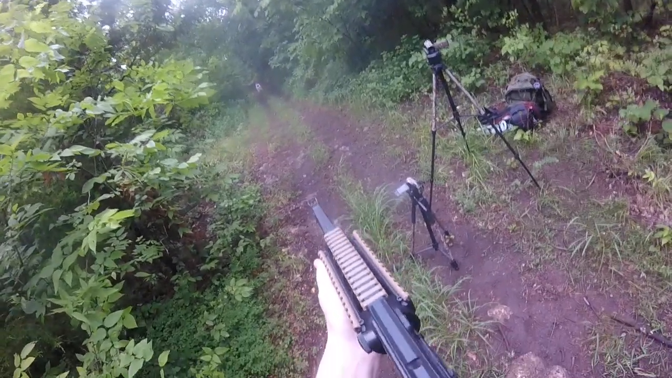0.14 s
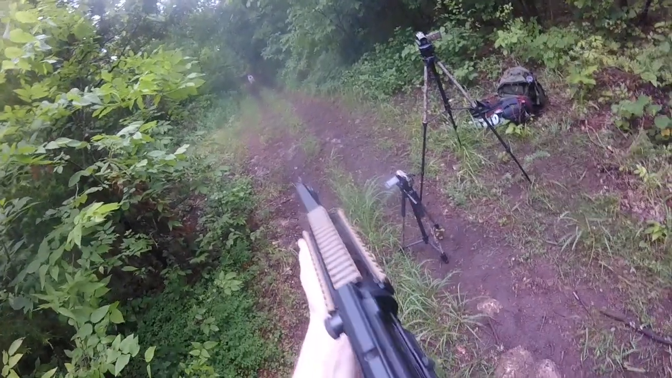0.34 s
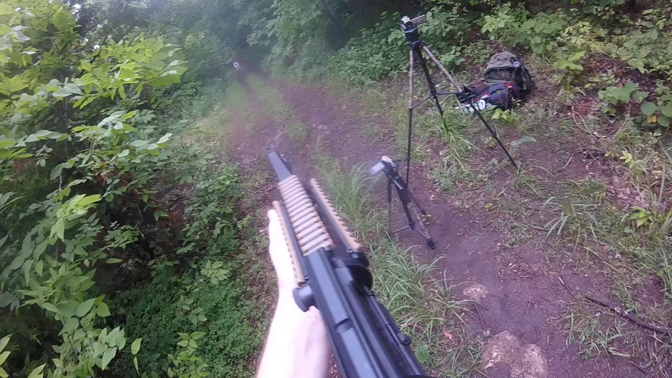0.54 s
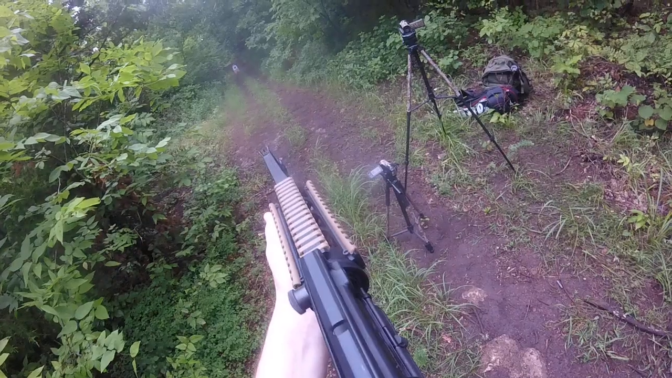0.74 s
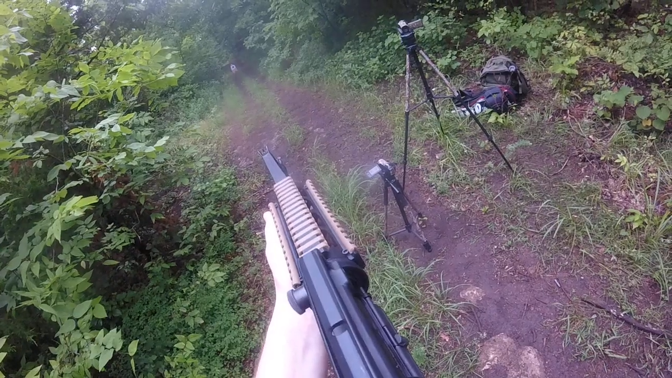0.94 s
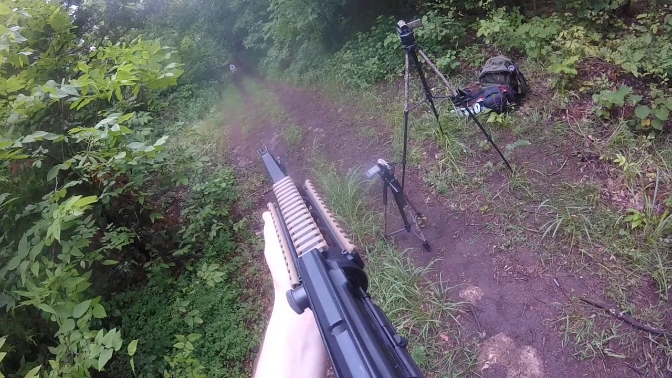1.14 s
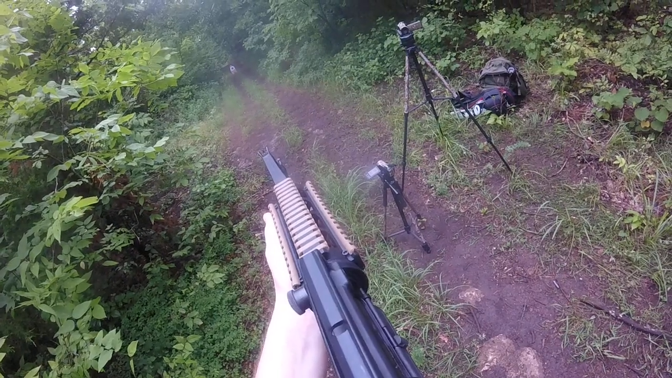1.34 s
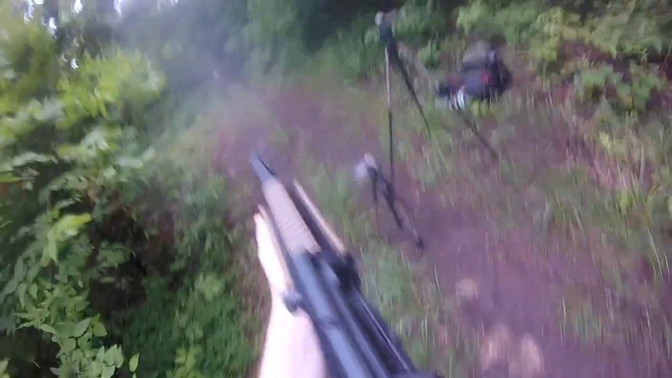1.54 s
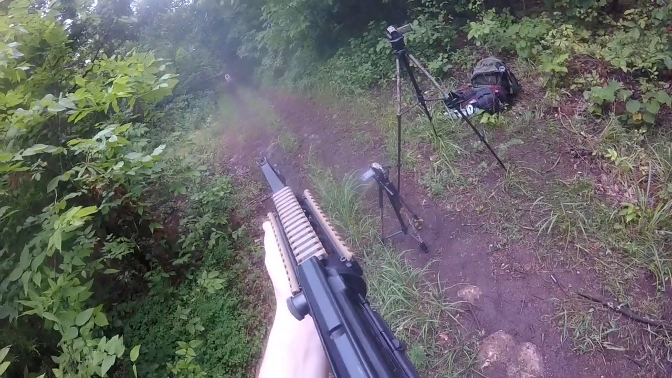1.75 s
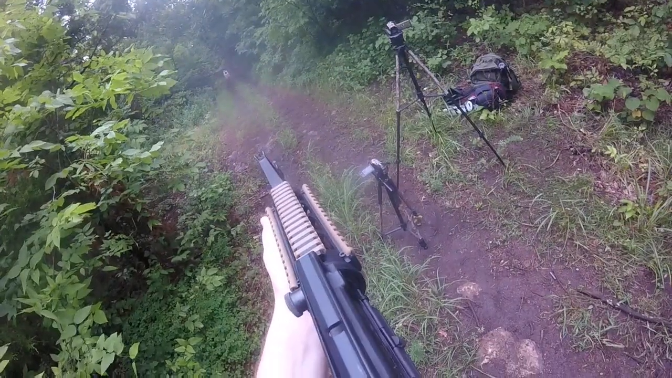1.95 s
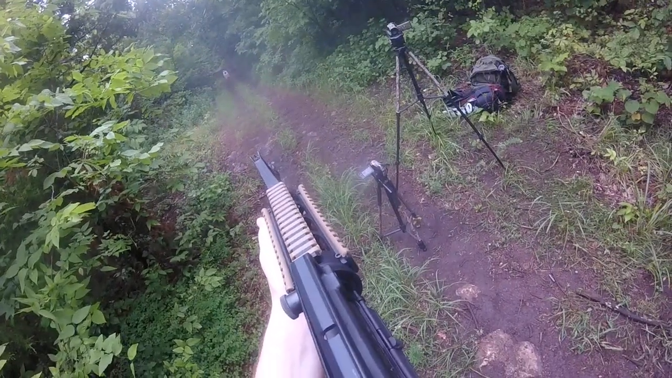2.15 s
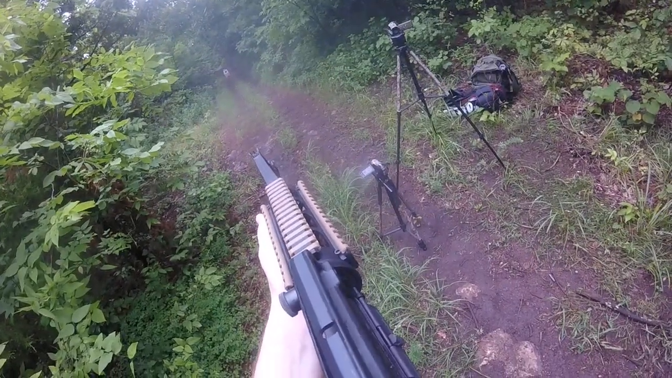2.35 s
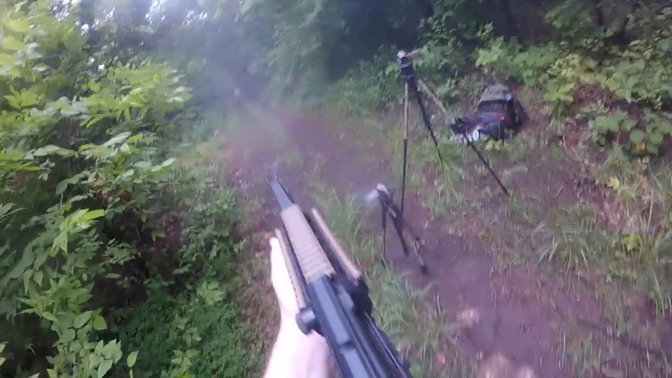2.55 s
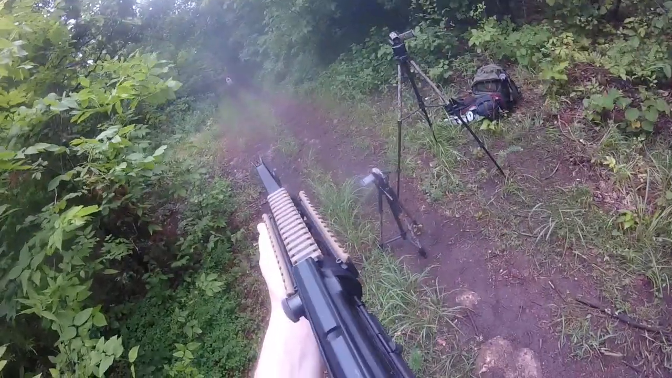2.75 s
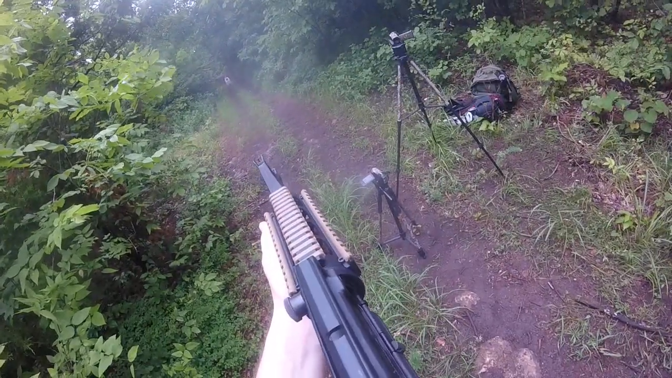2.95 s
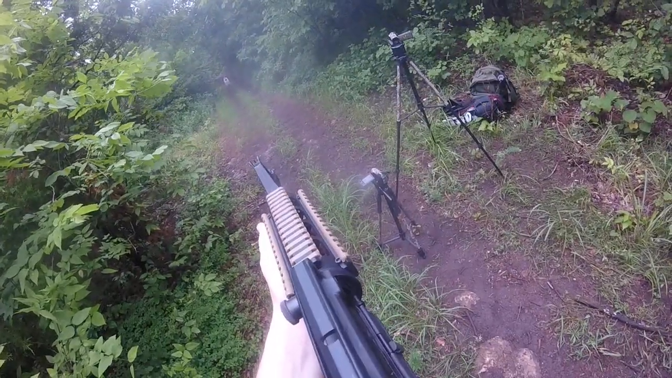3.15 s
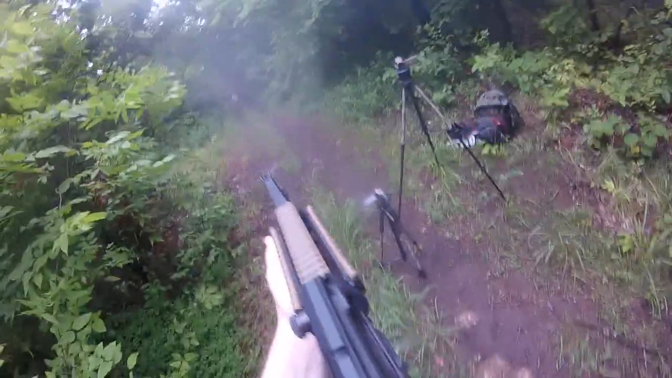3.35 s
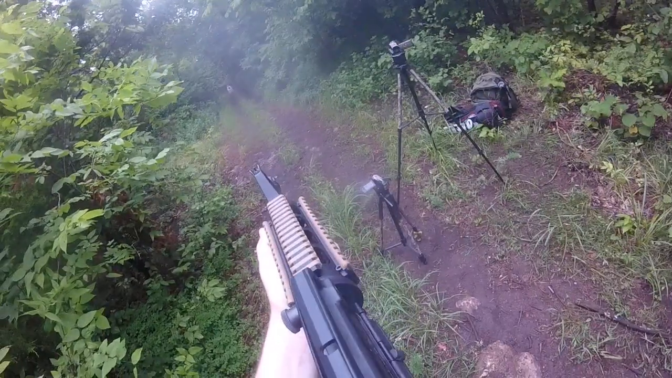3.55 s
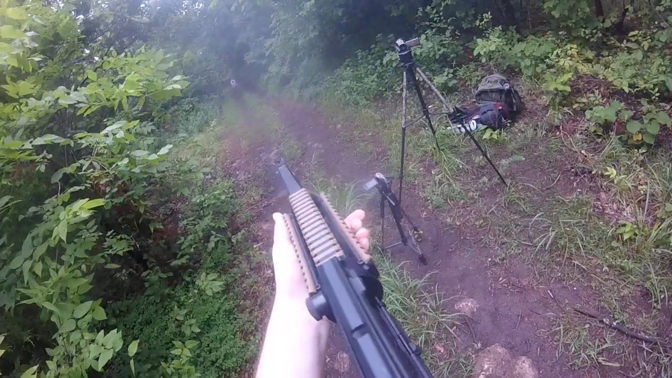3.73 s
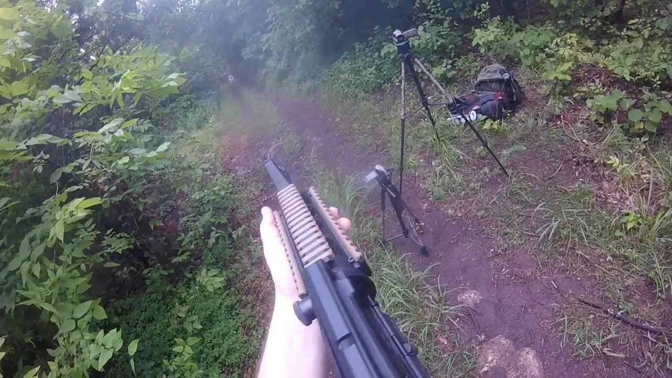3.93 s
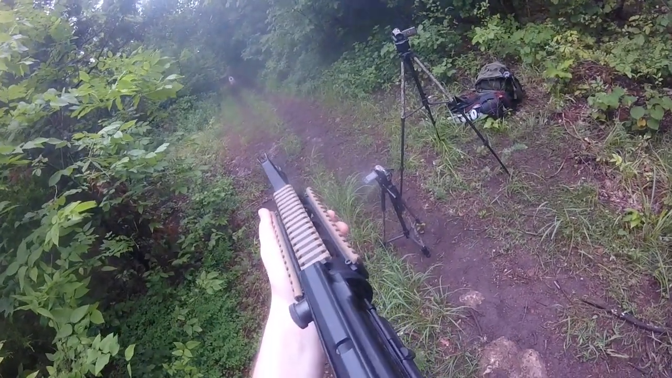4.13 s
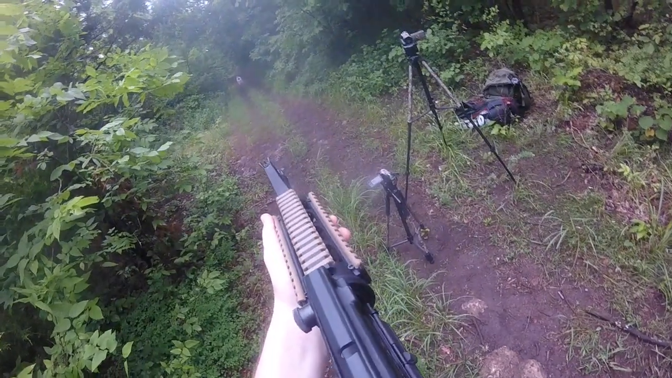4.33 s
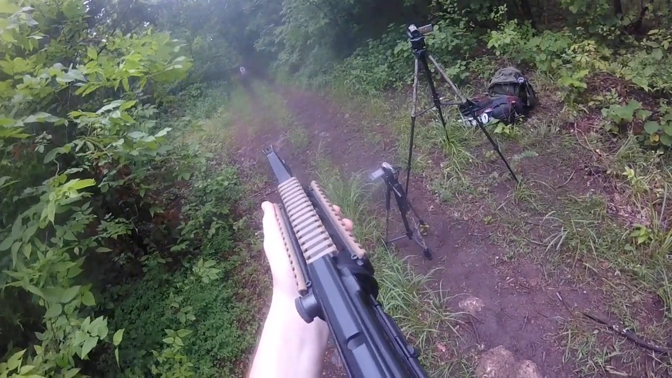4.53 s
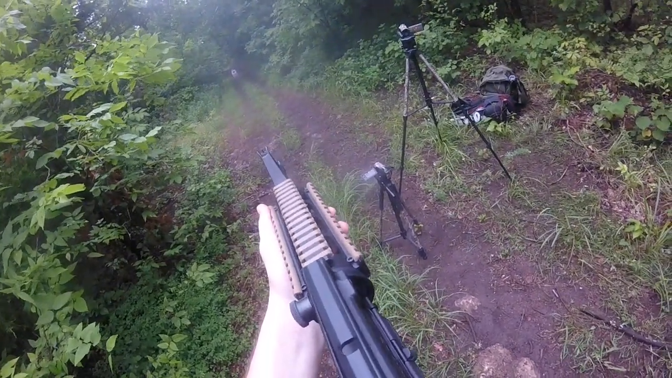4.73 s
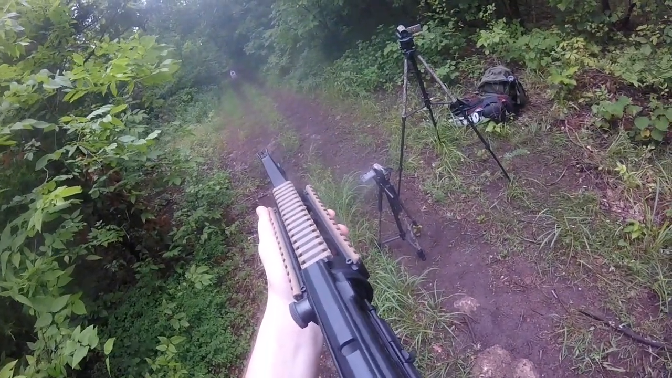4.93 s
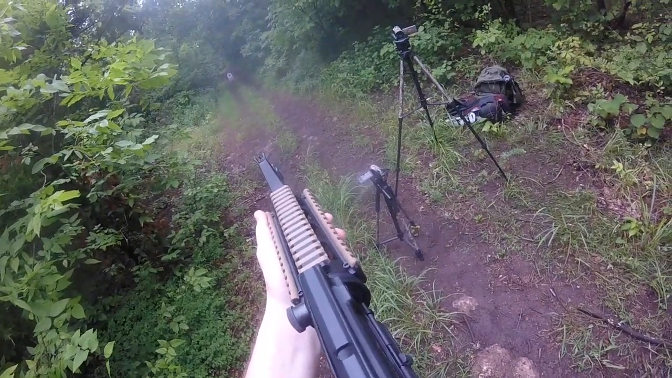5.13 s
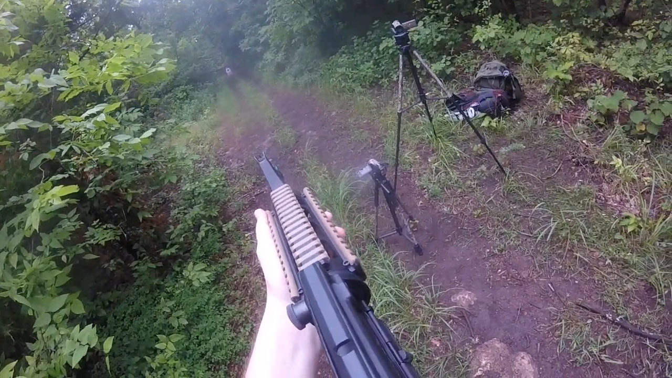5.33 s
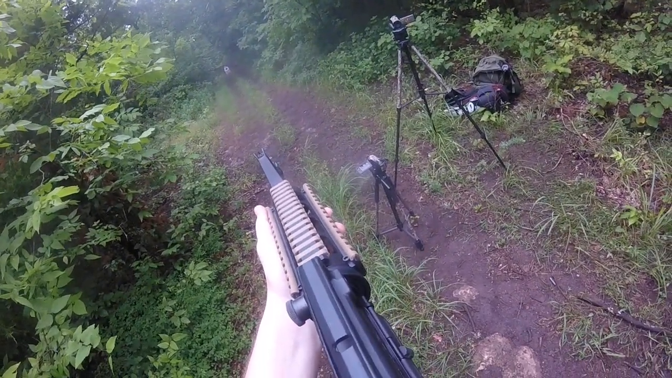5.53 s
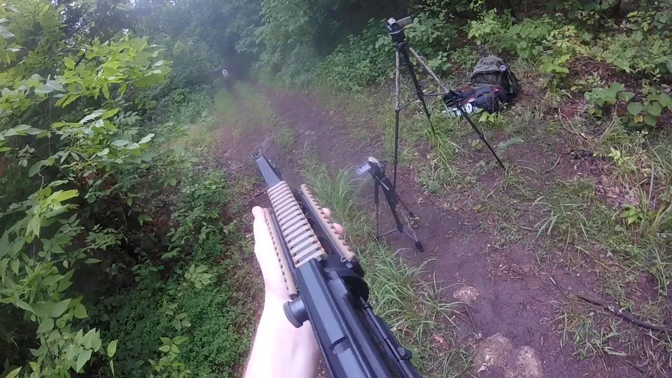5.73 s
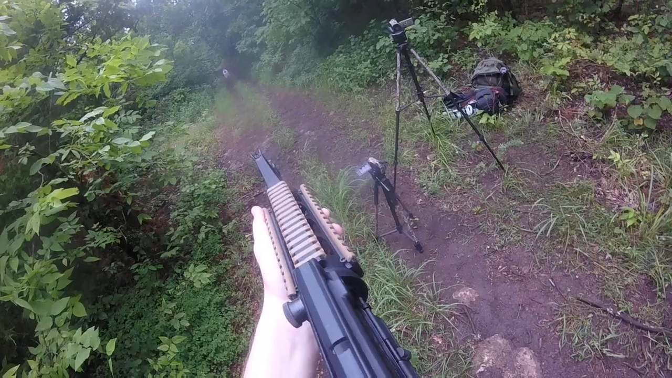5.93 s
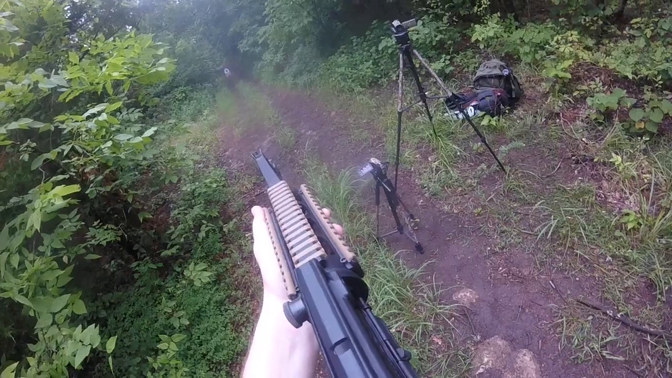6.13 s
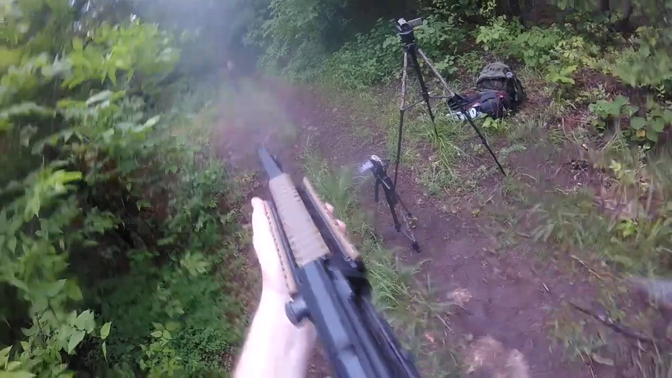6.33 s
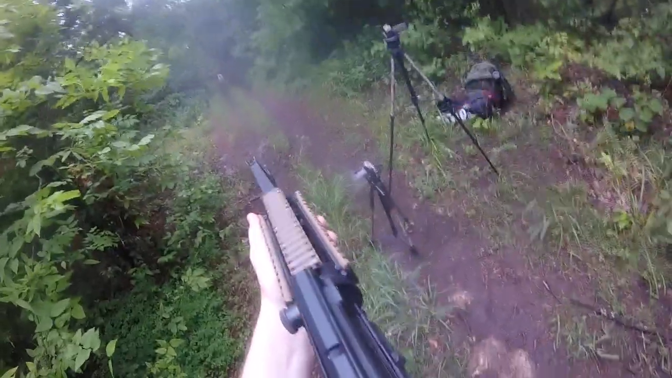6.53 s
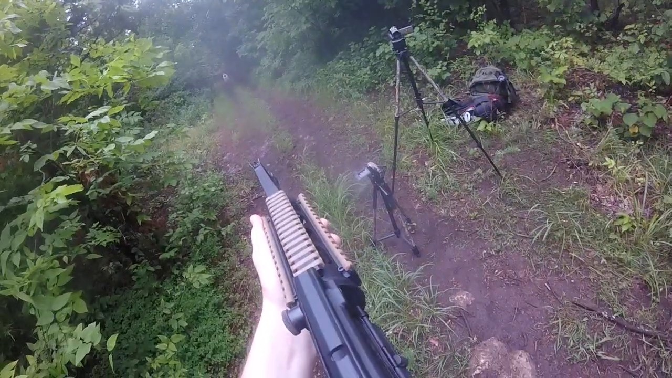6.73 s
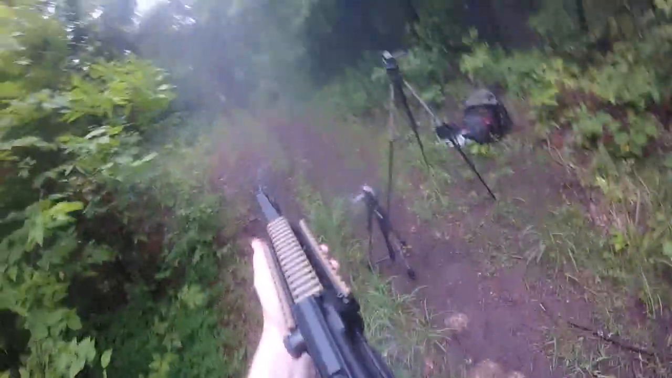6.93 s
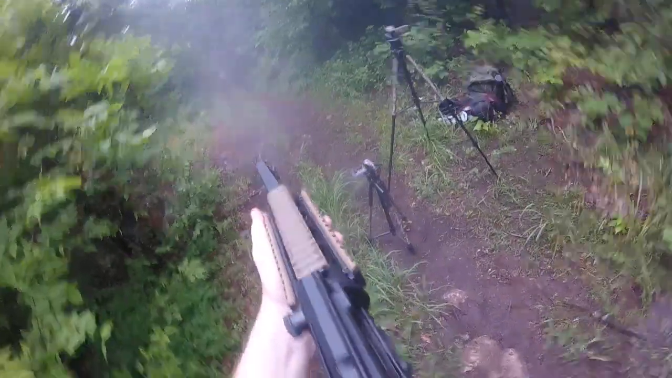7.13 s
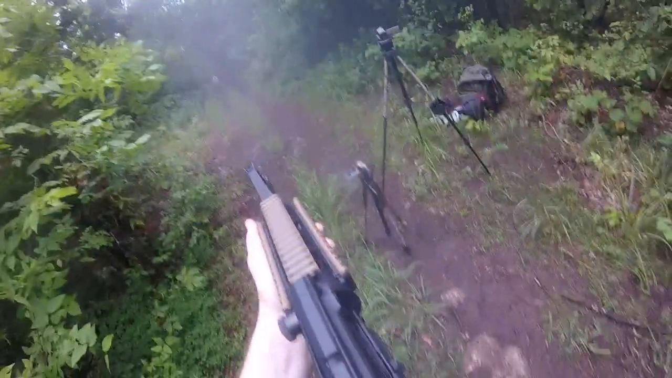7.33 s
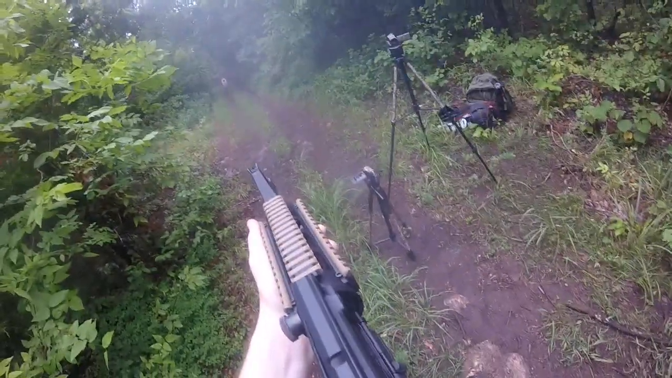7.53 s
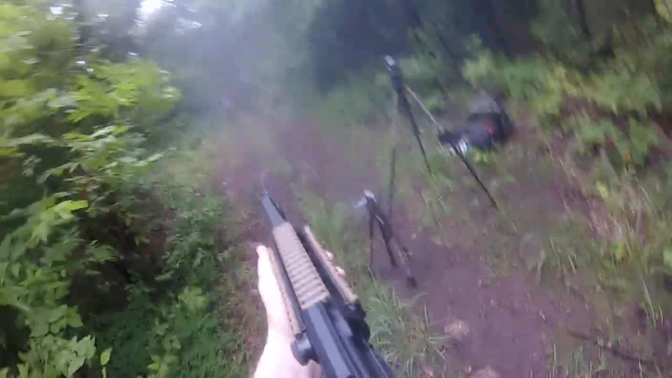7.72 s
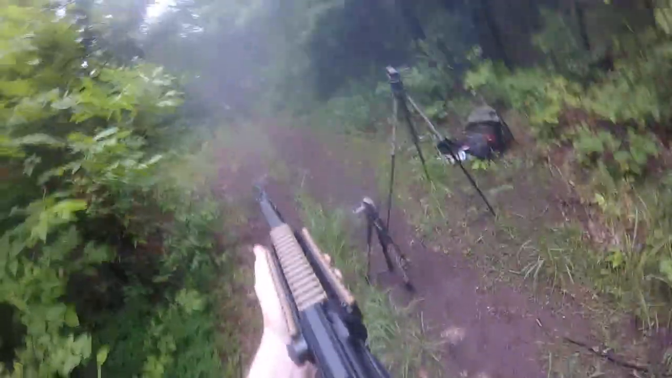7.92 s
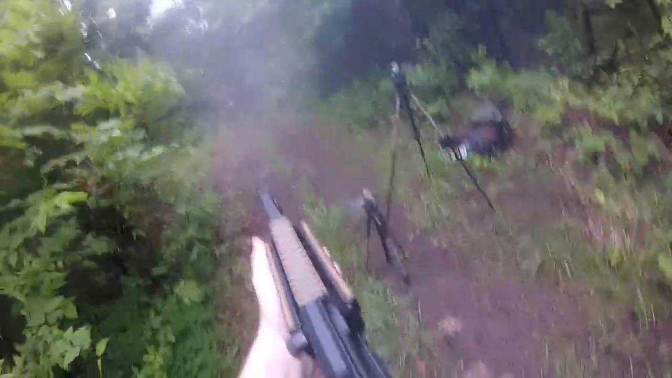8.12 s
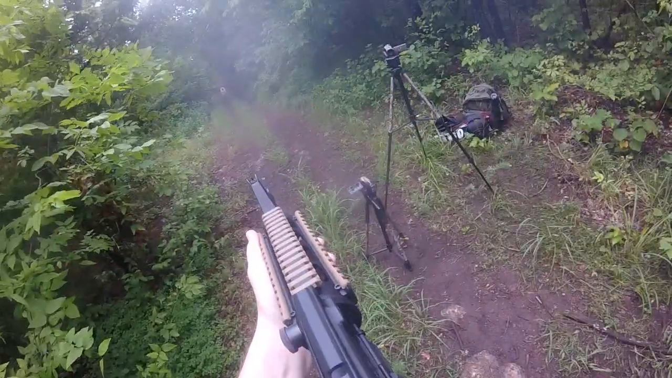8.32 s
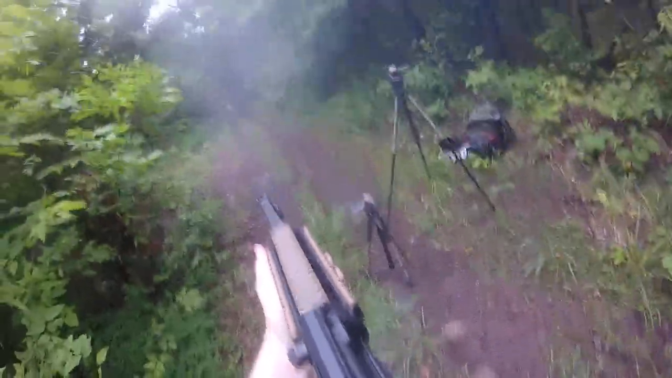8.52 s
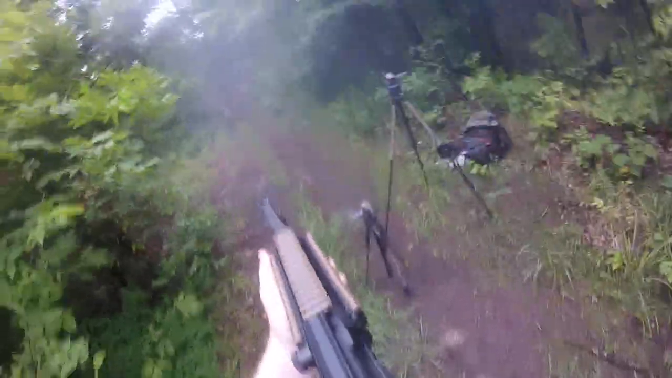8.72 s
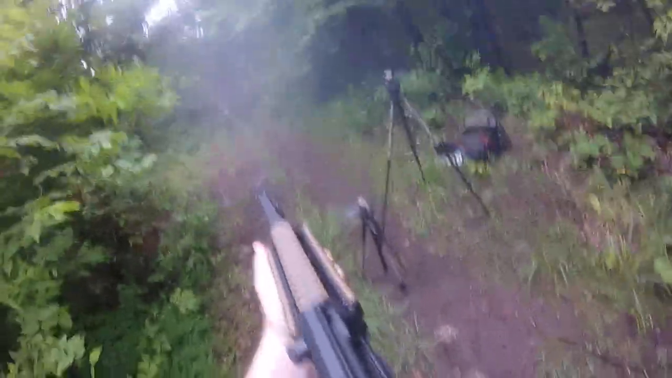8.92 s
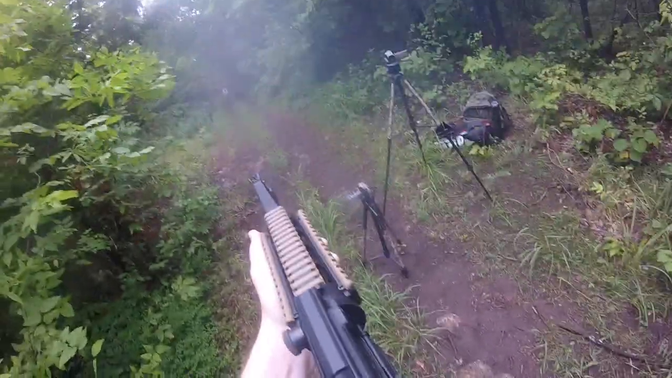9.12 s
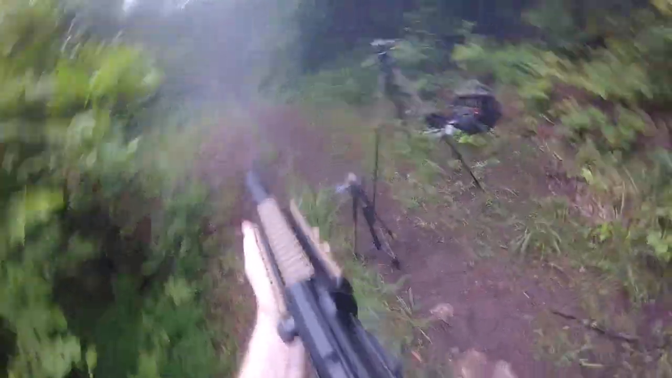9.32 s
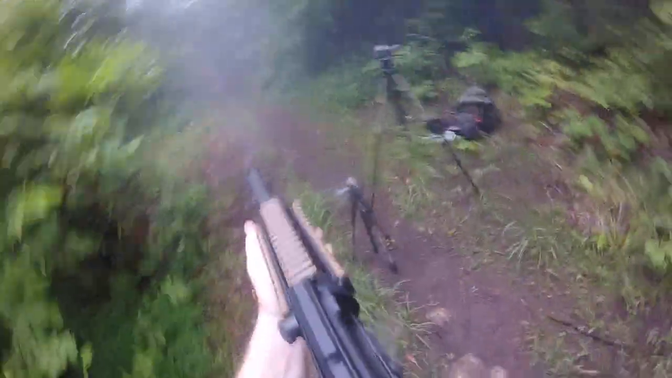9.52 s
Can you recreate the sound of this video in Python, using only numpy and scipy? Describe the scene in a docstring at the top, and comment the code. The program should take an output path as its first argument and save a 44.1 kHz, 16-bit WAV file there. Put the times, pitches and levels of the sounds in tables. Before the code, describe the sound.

A body-worn microphone beside a rifle on a forest track. Soft air and wind rumble, distant hoarse yelps and a hard metal clack with a brief rattle come first. Three separate blasts follow, each squashed and clipped, then a swelling, slowly dying woodland echo. After a pause with more faint yelps, rapid irregular shots pile up, some with an audible mechanical click just before the bang.

```python
"""Still air and wind rumble under the whole scene: coloured noise whose level flutters several times a second.
Far dogs yelp at once, as hoarse gliding partials; a hand knocks the rifle, which rings, spits grit and rattles.
Then fourteen rifle shots: hammer click, gas burst and pressure thump, with yelps again in the long pause.
Trunks, leaves and slopes return each blast as nearly the same echo, a filtered and dying scatter of taps.
A limiter and a slower gain control duck the blasts, and the echo swells as they let go."""
import sys
import numpy as np
from scipy import signal
from scipy.fft import rfft, irfft
from scipy.io import wavfile
from scipy.ndimage import uniform_filter1d

SR = 44100
rng = np.random.default_rng(int(sys.argv[2]) if len(sys.argv) > 2 else 0)


def transcribe(u):
    """Save the signal u as a 16-bit wav file named by the first command-line argument.

    u: samples, shape (n,) or (channels, n), limited to [-1, 1]; the rate is SR.
    q: integer samples, one column per channel.
    """
    v = np.clip(np.atleast_2d(u).T, -1, 1)
    q = np.round(v * 32767).astype(np.int16)
    wavfile.write(sys.argv[1], SR, q)


N = 422037


def gain_of(db):
    """Turns decibels into an amplitude factor."""
    return 10 ** (np.asarray(db) / 20)


def evened(x):
    """Scales a signal to rms 1."""
    return x / np.sqrt(np.mean(x ** 2) + 1e-20)


def read(points, hz):
    """Reads a table between its points on a log-frequency axis."""
    f, value = np.transpose(points)
    return np.interp(np.log(hz + 1), np.log(f + 1), value)


def add(mix, start_s, sound):
    """Lays a sound into the mix at start_s seconds."""
    part = mix[round(start_s * SR):][:len(sound)]
    part += sound[:len(part)]


def causal(colour, size=4096):
    """Makes the minimum-phase pulse of a colour: its energy comes as early as possible and sums to 1."""
    hz = abs(np.fft.fftfreq(size, 1 / SR))
    log_gain = np.log(gain_of(read(colour, hz)))
    spectrum = np.exp(np.conj(signal.hilbert(log_gain)))
    pulse = np.fft.ifft(spectrum).real[:size // 2]
    return pulse / np.linalg.norm(pulse)


def scatter(seconds, lumpy_db, size=24):
    """Puts one reflection of random place, sign and strength in every slot of size samples."""
    count = round(seconds * SR) // size
    place, sign, strength = rng.random((count, 3)).T
    position = np.arange(count) * size + (place * size).astype(int)
    taps = np.zeros(count * size)
    taps[position] = np.sign(sign - .5) * gain_of(-lumpy_db * np.log(strength + .00037))
    return evened(taps) / np.sqrt(size)


def dying(taps, *tails):
    """Lets every band die away as a power sum of (t60 table, level in dB) tails."""
    hz, t, bands = signal.stft(taps, SR, nperseg=256)
    power = 0
    for t60, db in tails:
        seconds = np.maximum(read(t60, hz), .02)[:, None]
        power = power + gain_of(db - 60 * t / seconds) ** 2
    return signal.istft(bands * np.sqrt(power), SR, nperseg=256)[1]


# Colours of the still air and the wind rumble. Each row: frequency in Hz, relative density in dB per Hz.
AIR_COLOUR = [(100, -7.5), (300, -0.5), (650, -2), (1200, -7), (2000, -16.5), (5000, -23), (6600, -27.5),
              (7100, -22), (7700, -29), (10500, -32), (12000, -49.5), (12700, -34), (13000, -71.5)]
WIND_COLOUR = [(12, 0), (25, 6.5), (45, -12), (70, -7), (100, -14.5), (150, -15), (220, -31), (400, -37),
               (800, -66)]
AIR_DB, WIND_DB = -56, -43.5  # levels around which the gusts flutter


def noise(colour, db, gusty_db):
    """Air noise: random pressure in a fixed colour, its level in dB fluttered by sines of 3 to 25 Hz."""
    hz, t = np.fft.rfftfreq(N, 1 / SR), np.arange(N) / SR
    gusts = np.zeros(N)
    for gust_hz in np.geomspace(3, 25, 16):
        gusts += np.sin(2 * np.pi * (gust_hz * t + rng.random())) / np.sqrt(gust_hz)  # random phase
    coloured = irfft(rfft(rng.standard_normal(N)) * gain_of(read(colour, hz)), N)
    return gain_of(db + gusty_db * evened(gusts)) * evened(coloured)


# Yelps of the dogs. Each row: start in seconds, length in seconds, first, top and last pitch in Hz,
# level in dB, then 2nd partial and each of 3rd and 4th partial in dB against the first.
BARKS = [(0.0, 0.027, 716, 702, 587, -43, -35, -45), (0.078, 0.11, 567, 731, 625, -40.5, -24, -49),
         (0.085, 0.1, 790, 958, 947, -53, -20, -45), (0.343, 0.12, 480, 692, 583, -41.5, -22, -51),
         (0.982, 0.051, 674, 731, 715, -42.5, -9.5, -29), (1.107, 0.032, 713, 713, 710, -43.5, -25, -45),
         (1.356, 0.11, 837, 1085, 860, -48.5, -25, -40), (1.387, 0.075, 620, 734, 570, -49, -3, -32),
         (4.431, 0.05, 810, 763, 758, -40.5, -34, -50), (4.742, 0.122, 929, 1005, 1012, -47, -21, -45),
         (4.799, 0.04, 677, 630, 577, -47, -10, -45.5), (5.332, 0.081, 654, 677, 687, -45, -8.5, -19),
         (5.376, 0.073, 762, 732, 710, -41.5, -21.5, -35), (5.49, 0.038, 728, 760, 730, -54, -19.5, -51),
         (5.604, 0.077, 497, 630, 709, -44, -16, -33), (5.645, 0.048, 953, 1056, 1080, -48.5, -20.5, -45),
         (5.679, 0.044, 700, 705, 696, -45, -21, -45), (5.95, 0.067, 524, 523, 432, -49.5, -7.5, -38.5)]


def dogs():
    """Far yelps: partials on a gliding, jittery pitch, blurred by breath and scattered late by the trees."""
    direct = np.zeros(N)
    hoarse = evened(uniform_filter1d(rng.standard_normal(N), size=220))
    breath = evened(np.convolve(rng.standard_normal(N), np.hanning(150), "same"))
    for s, length, first_hz, top_hz, last_hz, db, second_db, higher_db in BARKS:
        u = np.arange(round(length * SR)) / (length * SR)
        glide = np.interp(u, [0, .45, 1], [first_hz, top_hz, last_hz])
        hz = uniform_filter1d(glide, size=600, mode="nearest")
        here = slice(round(s * SR), round(s * SR) + len(u))
        phase = 2 * np.pi * np.cumsum(hz * (1 + .014 * hoarse[here])) / SR
        voice = np.sin(phase) + gain_of(second_db) * np.sin(2 * phase)
        voice += gain_of(higher_db) * (np.sin(3 * phase) + np.sin(4 * phase))
        voice *= (1 + .3 * breath[here]) * signal.windows.tukey(len(u), .3)
        add(direct, s, gain_of(db) * voice)
    t60 = [(400, 1.1), (800, .96), (1500, .85), (2200, .41)]  # Hz, seconds
    tail = dying(scatter(2.9, 1.1), (t60, 0))
    tail *= np.clip(np.arange(len(tail)) / SR / .051, 0, 1)  # the scatter builds up over 51 ms
    scattered = signal.fftconvolve(direct, tail / np.linalg.norm(tail))[:N]
    return direct + gain_of(-2.0) * scattered


# Knocks of the hand. Each row: start in seconds, level in dB, hardness as ring tilt in dB per octave.
KNOCKS = [(0.222, -39, -10.5), (0.311, -12.5, 2.5), (0.374, -56, 9.5), (0.468, -36, 3), (1.123, -75, 15.5)]
# Ringing modes of the rifle. Each row: frequency in Hz, level in dB before the tilt, t60 in seconds.
RIFLE_MODES = [(60, -17, .05), (200, -18, .03), (404, 0, .016), (1000, -5, .01), (2100, -17, .01),
               (3100, -19, .01)]
# A loose part rattling after the lever snaps. Its one row: start in seconds, end in seconds, level in dB.
RATTLE = (.312, 0.393, -46.5)
# Colour of rattle and grit. Each row: frequency in Hz, relative density in dB per Hz.
RATTLE_COLOUR = [(400, -4), (1200, -1), (1700, -24), (2400, -10), (2900, -17), (3600, -18), (5000, -23.5),
                 (12000, -30)]
GRIT_DB = -15  # at hardness 0


def handling():
    """Hand on the rifle: knocks ring its modes and spit grit, harder ones brighter; ticks make the rattle."""
    out, t = np.zeros(N), np.arange(3000) / SR
    for s, db, hard_db in KNOCKS:
        ring = np.zeros(len(t))
        for hz, mode_db, t60 in RIFLE_MODES:
            tilt_db = hard_db * np.log2(hz / 400)
            ring += gain_of(mode_db + tilt_db - 60 * t / t60) * np.sin(2 * np.pi * hz * t)
        spit = rng.standard_normal(len(t)) * np.exp(-t / .0025)
        grit = gain_of(GRIT_DB + 2 * hard_db) * np.convolve(spit, causal(RATTLE_COLOUR))[:len(t)]
        add(out, s, gain_of(db) * np.clip(t / .0006, 0, 1) * (ring + grit))
    start, end, db = RATTLE
    ticks = evened(scatter(.15, 3.5, size=30)[:round((end - start) * SR)])
    ticks *= signal.windows.tukey(len(ticks), .3)
    add(out, start, gain_of(db) * np.convolve(ticks, causal(RATTLE_COLOUR)))
    return out


# The ground and the nearest big trunks. Each row: delay in seconds, relative level in dB.
TRUNKS = [(0.0047, 13), (0.0082, 13), (0.0232, 11), (0.0307, 12.5), (0.0463, 15), (0.0956, 13.5),
          (0.1159, 13), (0.1582, 10), (0.1801, 11), (0.2355, 12), (0.2449, 11), (0.3348, 10.5),
          (0.3507, 10.5)]
FAR_TRUNKS_FROM_S, FAR_TRUNKS_GAP_S = .255, .012  # first delay, one trunk per gap
FAR_TRUNKS_DB, FAR_TRUNKS_SPREAD_DB = 7.5, 1.2  # mean and standard deviation, relative like TRUNKS


def stand_of_trees(seconds):
    """Trunks as reflectors: the near ones at set delays, the far ones at random over these seconds."""
    count = int(seconds / FAR_TRUNKS_GAP_S)
    place, size = rng.random(count), rng.standard_normal(count)
    delays = FAR_TRUNKS_FROM_S + (np.arange(count) + place) * FAR_TRUNKS_GAP_S
    return TRUNKS + list(zip(delays, FAR_TRUNKS_DB + FAR_TRUNKS_SPREAD_DB * size))


# Dense stands of trees. Each row: delay of the middle in seconds, depth in seconds, lift in dB.
STANDS = [(0.04, 0.03, 5.5), (0.348, 0.056, 0.5)]
# Decay of the bushes beside the track, the woods and the distant slopes.
# Each row: frequency in Hz, t60 in seconds.
NEAR_T60 = [(60, 0.28), (700, 0.32), (4000, 0.056), (12000, 0.033)]
WOODS_T60 = [(60, 1.9), (250, 0.78), (700, 1.887), (1400, 1.4), (3200, 0.91), (6500, 0.8), (11000, 0.64),
             (15000, 0.23)]
FAR_T60 = [(100, 3.1), (700, 6.34), (1500, 3.4), (3000, 1.6), (8000, 0.73)]
# Colour of an echo. Each row: frequency in Hz, relative density in dB per Hz.
ECHO = [(30, -37.5), (131, -10.5), (190, -12.5), (280, -9.5), (345, -5.5), (420, -4), (721, -4),
        (1000, -10.5), (1420, -13), (1650, -24), (2700, -22), (3600, -17.5), (3850, -24.5), (9700, -26.5),
        (14500, -28), (16000, -58.5)]


def woods(leaves, trees):
    """Echo of one blast: dull thuds from trunks stand out of the scatter from leaves and far slopes."""
    trunks, t = np.zeros(len(leaves)), np.arange(len(leaves)) / SR
    for delay, db in trees:
        add(trunks, delay, gain_of([db]))
    b, a = signal.butter(2, 1900, fs=SR)  # rough bark and foliage smear the treble of a trunk's echo
    thuds = signal.lfilter(b, a, gain_of(3.0) * trunks + leaves)
    hiss = rng.standard_normal(len(leaves))
    taps = thuds + gain_of(-8.5) * (hiss - signal.lfilter(b, a, hiss))
    taps *= np.clip(t / .004, 0, 1)
    lift_db = sum(db * np.exp(-((t - delay) / depth) ** 2) for delay, depth, db in STANDS)
    tail = dying(taps * gain_of(lift_db), (NEAR_T60, -11), (WOODS_T60, -5), (FAR_T60, -28))
    return signal.fftconvolve(tail, causal(ECHO))


# The shots. Each row: time in seconds, blast in dB, peak of the hammer click in dB,
# thump in dB on top of the blast level.
SHOTS = [(1.4929, 9.5, -5, -12), (2.429, 7.5, -8.5, -2), (3.2307, 8.5, -22, -1), (6.3492, 8, -26, 9.5),
         (6.8425, 8.5, -26, 11.5), (7.1594, 6, -24, 14), (7.6405, 7, -19, 11), (7.8364, 5, -19, 5),
         (8.0105, 7.5, -16, 14), (8.4152, 5.5, -20, 10), (8.6291, 6.5, -23, 14.5), (8.8172, 5.5, 2, 16.5),
         (9.2984, 7, -17, 10.5), (9.5015, 3.5, -10, 9)]
# Colours of the lock's crack and the muzzle gas. Each row: frequency in Hz, relative density in dB per Hz.
HAMMER = [(180, -49.5), (300, -17), (1030, -6), (1970, -18), (3030, -8.5), (5340, -17), (7320, -27.5),
          (14200, -27.5), (16000, -34)]
BLAST = [(30, -68), (150, 8), (400, -1), (1390, -3), (2480, -9), (4080, -11), (6550, -16.5), (12600, -21.5),
         (14800, -27), (16000, -36.5)]
HAMMER_LEAD_S = .0084  # the click starts this long before the shot's time


def rifle():
    """Shots: hammer click, ragged gas burst with a pressure step, then an echo partly reshuffled by moving air."""
    out, t = np.zeros(N), np.arange(900) / SR
    still, drifting = scatter(3.2, 1.2), [scatter(3.2, 1.5) for _ in range(3)]
    share = .22  # part of the scatter's power that moving air reshuffles
    trees = stand_of_trees(.6)
    echoes = [woods(np.sqrt(1 - share) * still + np.sqrt(share) * air, trees) for air in drifting]
    # the gas swells for 1 ms, holds until 4.8 ms and falls by 9 dB per ms
    gas = np.clip(t / .001, 0, 1) ** 3 * gain_of(-9000 * np.maximum(t - .0048, 0))
    # pressure step of the muzzle
    push = -1.3 * (1 - t / .0012) * np.exp(-t / .0013) * np.clip(t / .0013, 0, 1) ** 3
    for k, (s, blast_db, hammer_db, thump_db) in enumerate(SHOTS):
        chatter, roar = rng.standard_normal((2, len(t)))
        click = np.convolve(chatter * np.exp(-t / .0027) * (t < .007), causal(HAMMER))
        add(out, s - HAMMER_LEAD_S, gain_of(hammer_db) * click / abs(click).max())
        roar = np.convolve(roar, causal(BLAST))[:len(t)]
        burst = gas * roar / np.std(roar[:280])
        add(out, s - .0009, gain_of(blast_db) * (burst + gain_of(thump_db) * push))
        add(out, s, gain_of(blast_db) * echoes[k % 3])  # three echoes take turns
    return out


def scene():
    """Sums the still air, wind, dogs, hand and rifle."""
    background = noise(AIR_COLOUR, AIR_DB, .4) + noise(WIND_COLOUR, WIND_DB, 1.8)
    return (background + dogs() + handling() + rifle())[None]


def excess(x, threshold_db, recover_db, attack_s, size):
    """Level over a threshold in dB: peaks let go at recover_db a second, smoothed with time constant attack_s."""
    power = abs(uniform_filter1d(x ** 2, size, origin=size // 2 - 1))
    power_db = 10 * np.log10(power + 1e-12)
    fall_db = np.arange(N) * recover_db / SR
    held_db = np.maximum.accumulate(power_db + fall_db) - fall_db
    r = np.exp(-1 / (attack_s * SR))
    return signal.lfilter([1 - r], [1, -r], np.maximum(held_db - threshold_db, 0))


def record(dry):
    """A limiter and a slower gain control, which ducks the bass most; a fast ceiling, overload, band limit."""
    x = dry[0]
    quick_db = excess(x, -12, 70, .016, size=200)
    slow_db = .14 * excess(x / gain_of(quick_db), -42, 26.7, .0059, size=2000)
    bass = signal.lfilter(*signal.butter(2, 75, fs=SR), x)
    ducked_bass = bass / gain_of(3.0 * slow_db)
    x = (x - bass + ducked_bass) / gain_of(quick_db + slow_db)
    # the blast outruns the gain control and is caught by a fast ceiling on its rms
    rms = np.sqrt(abs(uniform_filter1d(x ** 2, size=60)))
    x = x / np.maximum(1, rms / .4)
    x = .85 * np.tanh(x / .85)  # soft overload
    band_limit = signal.firwin(511, 16400, window=("kaiser", 9), fs=SR)  # low-pass edge in Hz
    return signal.oaconvolve(x, band_limit, "same")[None]


dry = scene()
out = record(dry)
transcribe(out)
```